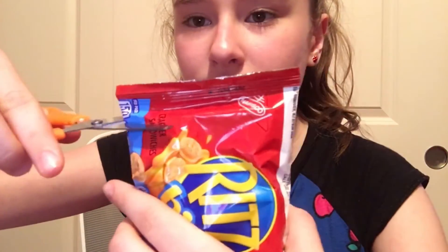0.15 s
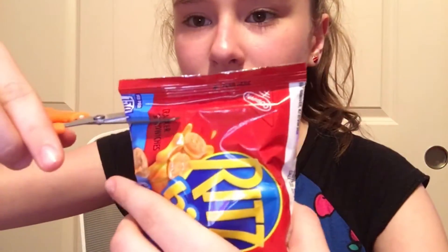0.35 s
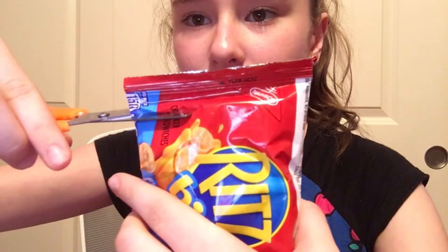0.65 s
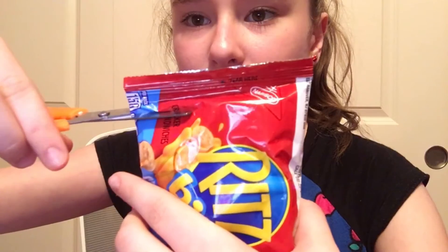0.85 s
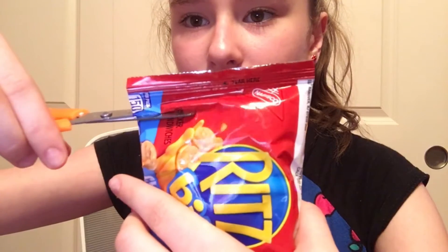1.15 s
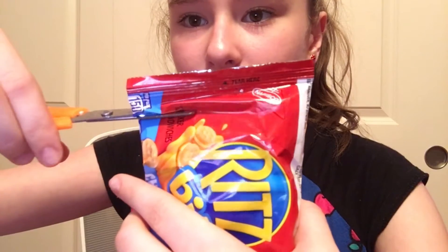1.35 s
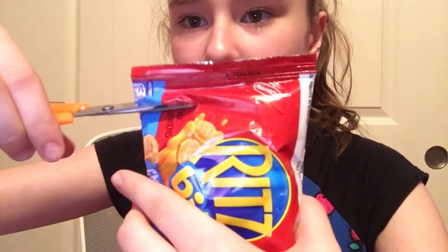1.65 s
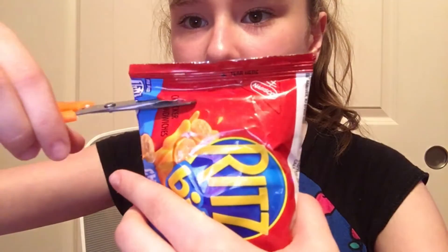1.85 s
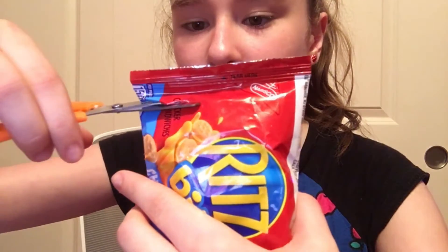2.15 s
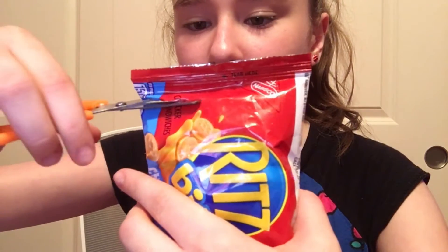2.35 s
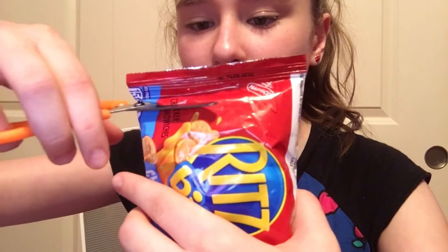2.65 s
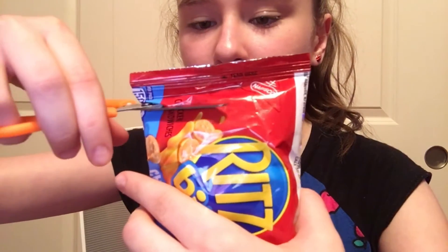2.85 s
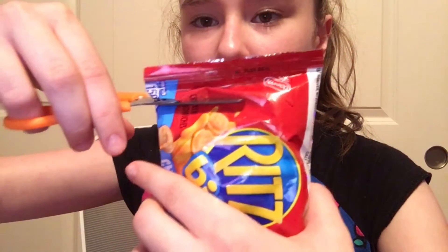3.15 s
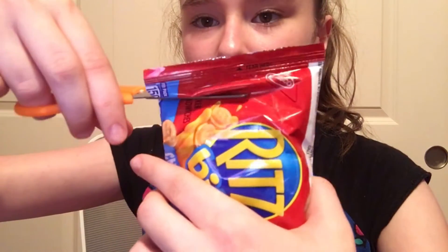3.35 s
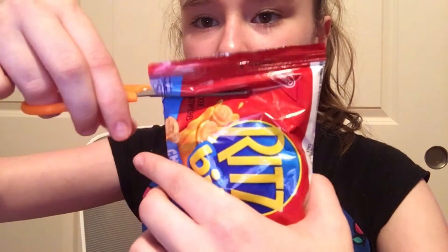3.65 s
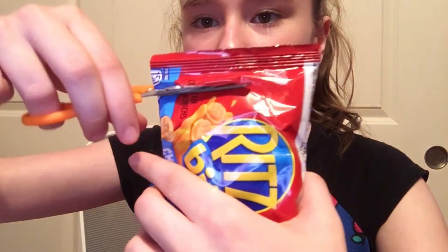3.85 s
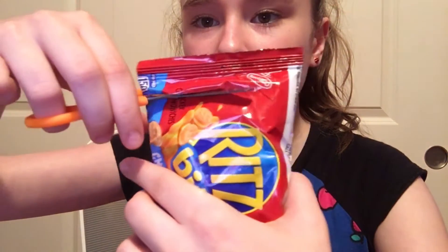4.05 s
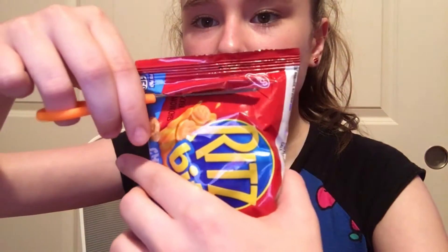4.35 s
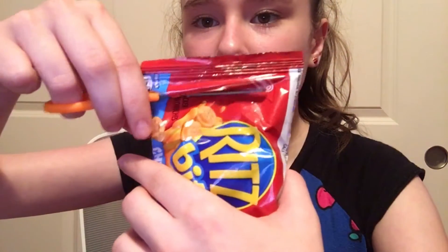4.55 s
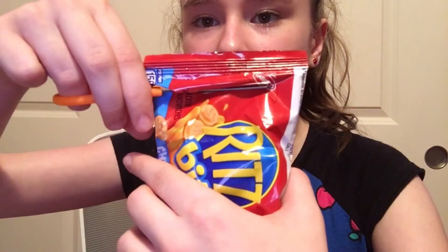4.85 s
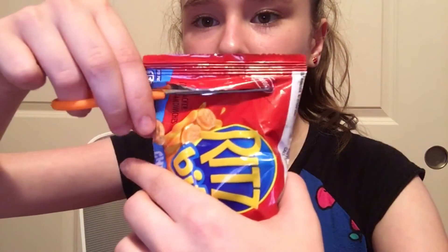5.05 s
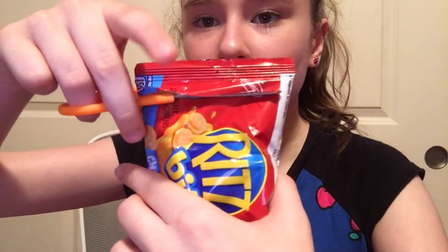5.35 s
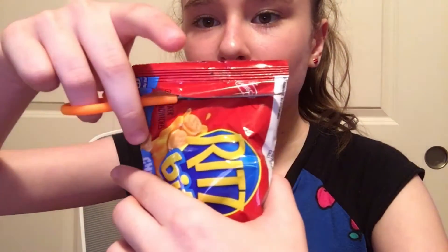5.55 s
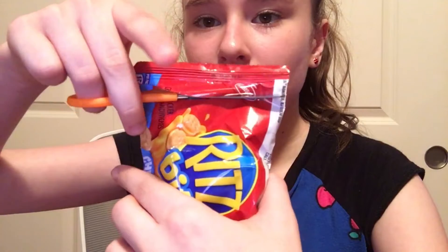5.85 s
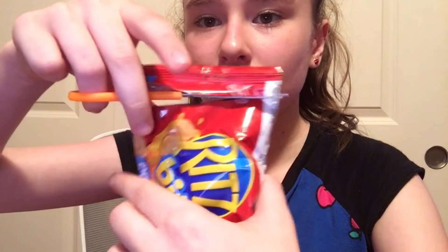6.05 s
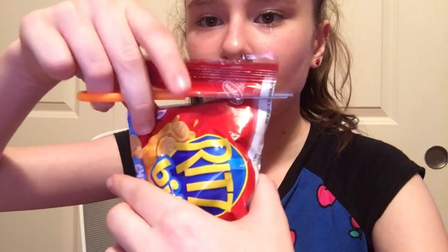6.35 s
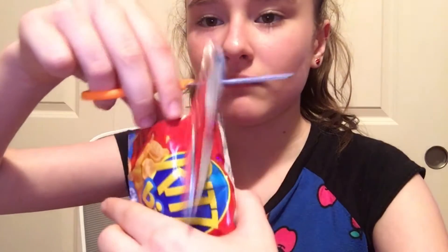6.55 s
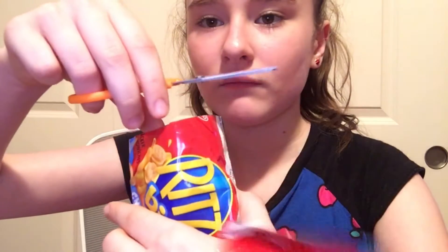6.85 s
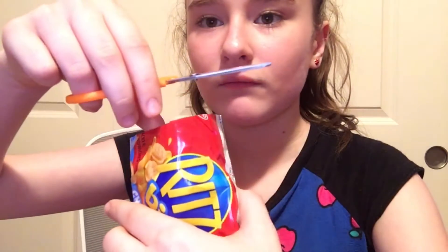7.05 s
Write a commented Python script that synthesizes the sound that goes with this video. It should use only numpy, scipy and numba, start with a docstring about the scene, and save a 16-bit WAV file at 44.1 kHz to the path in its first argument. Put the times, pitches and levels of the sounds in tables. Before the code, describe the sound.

Close to a small, easily overloaded microphone in a quiet little room, scissors work through a stiff plastic snack bag. Faint ticks give way to sharp irregular cracks and bright crinkling, then a short lull, a dense crackling run, more scattered hard snaps, and a final flurry as the top comes off. The loudest pops distort slightly. Low mains hum and soft hush lie underneath.

```python
"""Sharp cracks, the loudest clipped, leap out of a fine ticking rustle: scissors snip along a plastic snack bag
held close to a laptop microphone in a small room. Each crack is a ragged noise burst ringing film, air and foil;
the rustle is random puffs of noise through drifting resonances, faded in and out by every move of the hands.
Bands of fresh noise follow the bag's energy as a short dull tail, over sine-wave mains hum and a shaped hush."""
import sys
import numpy as np
from scipy import signal
from scipy.fft import rfft, irfft
from scipy.io import wavfile
from scipy.ndimage import uniform_filter1d
from numba import njit

SR = 44100
rng = np.random.default_rng(int(sys.argv[2]) if len(sys.argv) > 2 else 0)


def wrap_up_sound(samples):
    """Save the sound to the file named by the first command line argument, as 16-bit audio."""
    columns = np.atleast_2d(samples).T
    # keep every value between -1 and 1, then stretch to whole-number steps
    tamed = np.clip(columns, -1, 1)
    steps = np.round(tamed * 32767).astype(np.int16)
    wavfile.write(sys.argv[1], SR, steps)


N = 317520
T = np.arange(N) / SR

# resonances of the plastic film: (pitch [Hz], nominal width [Hz], level in the rustle before it wanders [dB])
FILM_MODES = [(570, 370, 1.5), (1198, 700, 9), (1830, 1500, 6.5), (2750, 800, 8), (4256, 550, 1.5)]
# sheen of the foil layer: (pitch [Hz], nominal width [Hz], level before it shifts [dB])
FOIL_MODES = [(5710, 2940, 4.5), (9800, 4600, -16), (11650, 2700, -3), (15200, 1900, -7.5)]


def cracks():
    """Creases in the stiff film buckle one by one; thin foil patches give way as smaller, brighter flicks."""
    # buckling creases: (time [s], panel level over 1.4 ms [dB], panel pitch [Hz],
    # bag thump re panel [dB], treble snap re panel [dB], nominal slip length [ms])
    buckles = [(0.0728, -30, 2850, -6, -9.5, 1.1), (0.2828, -23.5, 2310, -4, -30, 0.9),
               (0.3213, -6, 1620, -13, 0.5, 1.45), (0.3806, -13, 1000, -0.5, -19, 4.9),
               (0.444, -25, 1290, -13, -30, 0.69), (0.4539, -25.5, 970, 1, -16, 5.5),
               (0.487, -11, 2600, -9.5, -23, 0.65), (0.502, -7, 3370, -10, -3, 1.17),
               (0.532, -17.5, 1780, -5.5, -19, 3.3), (0.6579, -22, 2680, 0.5, -30, 0.77),
               (0.6662, -8.5, 1800, -9, -12.5, 1.14), (0.8744, -12.5, 3120, -2, -9, 2.2),
               (0.9561, -6.5, 1000, -5.5, -11.5, 2.6), (0.9909, -5, 2820, -16, -14, 1.3),
               (1.166, 2.5, 2720, -13, -3, 2.53), (1.176, -6.5, 3060, -6.5, -7.5, 4),
               (1.2939, -13, 1200, -5, -27, 1.2), (1.3212, -14, 1730, -19, -27, 1),
               (1.329, -13, 2390, -3, -9, 1.3), (1.3463, 6.5, 2360, -15.5, -14.5, 2.7),
               (1.4555, -14.5, 3080, -38, -0.5, 1.3), (1.4784, -9.5, 3620, -7, -13, 2.5),
               (1.5472, -14, 2430, -6, -17, 2.6), (1.6034, -26, 1210, -26, -14, 0.9),
               (1.6464, -12.5, 2900, -20, -18, 2.9), (1.655, -18.5, 1530, -7, -3, 2.3),
               (1.6752, -9.5, 2870, -11, -14, 1), (1.6978, -12.5, 2310, -14, -20, 1.6),
               (1.7046, -12.5, 2820, -11, -19, 1.3), (1.736, -12, 1510, -8, -29, 1.5),
               (1.755, -13, 2800, -13.5, -15, 1.6), (1.7593, -1.5, 2140, -12.5, -9.5, 1.8),
               (1.7685, 0.5, 2850, -8, -7, 3.2), (1.8091, -17, 2400, -6.5, -9.5, 1.2),
               (1.954, -6.5, 3020, -14, -11.5, 0.88), (2.07, -32, 1180, -5.5, -18, 2.5),
               (2.2294, -14, 1200, -6.5, -17, 3.3), (2.475, -22.5, 1390, -6, -18, 4.3),
               (2.504, -27.5, 3070, -26, -4.5, 4.3), (2.589, -22.5, 1030, -5, -29, 3.8),
               (2.6362, -13.5, 3060, -24, -4.5, 1.3), (2.9866, -6, 1046, -4.5, -14, 4.3),
               (3.0007, -11, 2300, -16, -20, 2.4), (3.0408, -25, 1690, -9, -25, 3),
               (3.122, -18.5, 1740, -5, -20, 2.7), (3.134, -13.5, 1500, -4.5, -23, 10),
               (3.1438, -7.5, 3400, -15, -10, 1.9), (3.1571, -8, 2800, -13, -7, 1.42),
               (3.1605, -9.5, 3000, -3.5, -7.5, 0.86), (3.198, -13.5, 1900, -10, -12, 2.5),
               (3.22, -11.5, 1890, -16, -5.5, 3.7), (3.225, -11.5, 3250, -4, -9, 3.6),
               (3.2294, -14.5, 1150, -6, -15, 4.1), (3.2478, -8.5, 2700, -12, -4, 1.8),
               (3.2778, -19, 1810, -3, -11, 1.5), (3.302, -23, 2500, -13, -8, 4),
               (3.3121, -6, 1710, -17, -9, 0.86), (3.343, -12, 4200, -6, -7, 0.92),
               (3.3722, -14, 2800, -3.5, -8, 1.7), (3.3859, -13.5, 1870, -15, -8, 5.5),
               (3.3921, -12, 4300, -4, -2, 3.4), (3.4009, -8, 1210, -12, -29, 3),
               (3.4385, -20.5, 4400, -5, -14, 4.2), (3.49, -20, 1930, -10, -13, 0.86),
               (3.5457, -15.5, 3160, -5.5, -17, 0.8), (3.561, -23.5, 970, -5, -4.5, 2.6),
               (3.6418, -19, 1780, -9.5, -21, 1.8), (3.6705, -11, 1320, -16.5, -12.5, 2.9),
               (3.6765, -10, 2760, -7.5, -31, 1.9), (3.689, -14.5, 2510, -17, -13, 1.3),
               (3.728, -18.5, 2650, -19, -19, 2.1), (3.7603, -13, 1290, -11.5, -16, 0.85),
               (3.79, -14, 1540, -13, -13, 1.6), (3.7977, -25, 3780, -7, -7, 0.99),
               (3.835, -3, 2600, -6.5, -7, 0.82), (3.8604, -14, 2500, -12, -15, 0.77),
               (3.931, -11.5, 2500, -11.5, -14, 2.9), (3.9505, -24, 2460, -8, -20, 0.88),
               (3.967, -24, 1540, -9, -24, 2.4), (4.2469, -21.5, 2840, -27, -14.5, 2.8),
               (4.3911, -9.5, 2030, -6, -9, 5.5), (4.399, -3, 1080, -14, -11, 1.5),
               (4.4586, -16, 2820, -11, -12, 1.7), (4.5301, -21, 2780, -16, -23, 2.4),
               (4.544, 1, 2830, -13, -8, 1.1), (4.5538, -2.5, 1680, -1, -19, 8.2),
               (4.557, -7, 890, -3, 0.5, 1.5), (4.5886, 2, 3170, -23, -1.5, 1.34),
               (4.5907, -20, 3080, -18, 5, 2.4), (4.596, -11, 3030, -13, 0, 1.4),
               (4.6564, -9.5, 1210, -47, -4, 1.2), (4.661, -5.5, 3130, -14, -12, 1.5),
               (4.6673, -5.5, 2960, -10, -5.5, 10), (4.6757, -2.5, 2900, -16, 0, 1.64),
               (4.6999, -10, 2180, -11, -27, 2.0), (4.7394, -18, 3320, -12, -3, 1),
               (4.8721, -21.5, 4430, -11, -8.5, 3.8), (4.9446, -18.5, 2070, -8, -11, 3),
               (4.9643, -13.5, 2880, -12, -2.5, 2.7), (5.0299, -2.5, 1020, -12.5, -15, 1.4),
               (5.22, -10, 2430, -19, 0, 5.9), (5.2252, 7, 2900, -9, -5.5, 3.26),
               (5.475, -27, 1840, -3, -18, 1.8), (5.7364, -24, 1720, -28, -20, 0.96),
               (5.7508, 0.5, 2900, -19, -5, 1.33), (5.809, -27, 1500, -5, -0.5, 8.9),
               (6.0304, -1, 3520, -15.5, -7.5, 1.75), (6.2002, -24, 3000, -21, -8, 2.4),
               (6.222, -24.5, 1196, -3.5, -25, 2.4), (6.2532, -9, 3050, -16, -0.5, 1.8),
               (6.293, -17, 3170, -11, -4, 1.1), (6.3656, -1, 2700, -11.5, -0.5, 0.69),
               (6.3677, -3, 1340, -7.5, -5, 2.2), (6.383, -14, 2260, -11, -1, 1.8),
               (6.3995, -5.5, 2360, -13, -28, 1.8), (6.4105, 0.5, 1670, -12, -4, 5.1),
               (6.431, -6, 1050, -16, -11, 3.8), (6.4805, -17, 1750, -2.5, -29, 0.59),
               (6.5963, -18.5, 1020, -4.5, -33, 3.4), (7.0206, -13.5, 2690, -15, -14.5, 0.84),
               (7.1088, -28, 1570, -9.5, -15, 2.5)]
    # bright ticks of small foil patches: (time [s], panel level over 1.4 ms [dB])
    flicks = [(0.271, -45.5), (0.525, -37), (0.584, -45.5), (.6393, -41), (0.763, -32), (0.8248, -39),
              (0.87, -33), (.8917, -32), (0.926, -27.5), (1.235, -40), (1.395, -38), (1.43, -43),
              (1.5972, -39), (1.877, -47), (2.141, -43.5), (2.362, -48), (3.1835, -34), (3.457, -41),
              (3.715, -34), (4.3714, -38), (4.468, -34), (4.4732, -27.5), (4.515, -37.5), (4.9216, -38),
              (5.059, -35), (5.917, -24), (6.352, -24.5), (6.574, -45), (6.8555, -43)]
    # what all flicks share: (panel pitch [Hz], bag thump [dB], treble snap [dB], nominal slip length [ms])
    flick_sound = (4190, -16, 4.5, 2.5)
    creases = buckles + [(*flick, *flick_sound) for flick in flicks]
    out = np.zeros(N + 1024)
    for time_s, level_db, *sound in creases:
        start = int(time_s * SR)
        out[start:start + 1024] += undb(level_db) * buckle(level_db, *sound)
    return out[:N]


def buckle(level_db, panel_hz, thump_db, snap_db, slip_ms):
    """A crease slips in a ragged burst; the panel rings briefly, the air in the bag thumps on a little longer."""
    t = np.arange(1024) / SR
    noise, ragged = rng.standard_normal((2, 1024))
    slip_s = max(slip_ms - 0.8, 0.2) / 1000
    front = noise * undb(3.5 * ragged) * np.minimum(t / 0.00016, 1) * np.exp(-(t / slip_s) ** 2)
    # the crease settles after the jump; the treble snap leaves this part out
    slip = front + 0.28 * noise * np.exp(-t / 0.0018)

    film = []
    for hz, width_hz, _ in FILM_MODES:
        bend, weight = rng.standard_normal(2)  # every fold retunes and reweights the film
        film.append(undb(7.2 * weight) * ring(slip, hz * np.exp(0.16 * bend), 0.32 * width_hz))
    low, *upper = film

    panel = unit(ring(slip, panel_hz, 0.2 * panel_hz)) + 0.69 * unit(sum(upper)) + 1.17 * unit(slip)
    panel = passband(1000, 4030)(panel)

    thump = unit(low) + 0.55 * unit(ring(slip, 916, 240)) + 0.56 * unit(ring(slip, 319, 140))
    thump = unit(passband(160, 2340)(thump))
    # strong buckles also shove air at the microphone
    puff = undb(-13.0 + 0.18 * level_db) * unit(ring(slip, 141, 59))

    crack = unit(panel) + undb(thump_db) * (thump + puff) + undb(snap_db) * sheen(front, snap_db)
    return crack * np.sqrt(0.0014 / t[-1])  # from level over the whole window to level over 1.4 ms


def sheen(x, snap_db):
    """The foil layer rings; the brighter the slip, the more the upper resonances join in."""
    foil = 0
    for k, (hz, width_hz, db) in enumerate(FOIL_MODES):
        mode = ring(ring(x, hz, width_hz), hz, width_hz)
        foil = foil + (-1) ** k * undb(db + 0.28 * k * snap_db) * mode
    return unit(foil)


def rustle():
    """Film slides on blades and fingers: dense grain and sparse ticks ring panels that drift in pitch and level."""
    # spans in which the film glides more smoothly: (from [s], to [s])
    slides = [(2.43, 2.75), (3.98, 4.36), (5.98, 6.19)]
    # pitch of the low scrape as the grip changes the air pocket in the bag: (time [s], pitch before drift [Hz])
    pocket = [(0, 560), (3.85, 600), (4.05, 360), (4.4, 360), (4.6, 520), (5.3, 600), (7.2, 630)]
    sliding = sum((T > start) & (T < end) for start, end in slides)
    tick_gain = undb(-4 * sliding)  # sparse ticks are weaker against the grain while sliding
    sheet_ticks = 1.25 * ticks(70, 8.1, 0.0027)
    scrape_mode = [(np.interp(T, *np.transpose(pocket)), *FILM_MODES[0][1:])]

    layers = []
    for modes in (scrape_mode, FILM_MODES[1:], FOIL_MODES):
        layer_ticks = sheet_ticks + 0.7 * ticks(250, 5, 0.0004)
        panels = 0
        for hz, width_hz, db in modes:
            panel_ticks = layer_ticks + 0.58 * ticks(42, 6.4, 0.0012)
            grain = ticks(2400, 1.6, 0.0036)
            slips = tick_gain * panel_ticks + grain
            drifting_hz = np.minimum(hz * np.exp(0.086 * walk(14)), 0.45 * SR)
            panel = glide(slips, drifting_hz, 1.0 * width_hz)
            panel = glide(panel, drifting_hz, 2.0 * width_hz)
            panels = panels + undb(db + 2.42 * walk(14)) * panel  # panels take turns in sounding loudest
        layers.append(unit(panels))
    return sum(gain * layer for gain, layer in zip(handling(), layers))


def ticks(rate_hz, spread_db, smear_s):
    """Random tiny slips, most faint and a few strong, each a short decaying puff of noise."""
    when, chance = rng.random((int(rate_hz * N / SR), 2)).T
    strength_db = np.minimum(-spread_db * np.log(1 - chance), 14.5)
    slips = np.bincount((when * N).astype(int), undb(strength_db), N)
    puffs = signal.lfilter([1], [1, -np.exp(-1 / (smear_s * SR))], slips)
    return unit(puffs * rng.standard_normal(N))


def handling():
    """Gains of scrape, film and foil: moves rise, hold and fade straight in dB, and their powers add up."""
    # moves of blades or fingers: (time of full level [s], rustle level [dB], rise per 20 dB [ms], hold [ms],
    # fade per 20 dB [ms], low scrape re rustle [dB], treble re rustle [dB])
    moves = [(0.012, -42, 4.7, 47, 30, -5, -14.5), (.176, -47.5, 60, 4.6, 121, -16, -13),
             (.335, -48, 80, 220, 230, -6.5, -11), (.874, -47.5, 120, 170, 205, -2, -5),
             (1.143, -39, 6.5, 20, 30.3, -3, -10), (1.175, -29.5, 17, 5, 74.07, -8, -12),
             (1.279, -31, 8.7, 35, 60, -26, -13), (1.342, -25, 40, 3.1, 68, -4, -6),
             (1.475, -31.5, 48, 4.4, 74.07, -11.5, -14), (1.637, -28, 52, 5.8, 74.6, -12.5, -10.5),
             (1.774, -32, 29, 5, 120.4, -16.5, -7.5), (2.34, -46, 810, 61, 100, -9, -24),
             (2.455, -35, 48, 70, 285, -8, -11.5), (2.7, -35, 260, 26, 38.4, -7, -8),
             (3.149, -35.5, 110, 22, 100, -4, -14), (3.237, -33, 73, 20, 150, -14, -8),
             (3.309, -26, 9.7, 39, 40, -6.5, -12), (3.394, -28, 37, 3.9, 77.4, -15, -12),
             (3.686, -31, 66, 38, 201, -8, -8), (3.95, -32.5, 180, 85, 122, -8.5, -9),
             (4.12, -39.5, 200, 74, 198, -2, -15), (4.406, -34, 150, 14, 198, -2.5, -10),
             (4.526, -32.5, 7, 110, 102, -6, -7), (4.654, -20.5, 11, 46, 65, -8, -9),
             (4.956, -31, 60, 4.3, 199, -7, -7.5), (5.236, -29, 140, 3.1, 143, -8, -9),
             (5.47, -41.5, 400, 11, 196, -1, -10.5), (5.704, -41, 30, 53, 50, -8, -18),
             (5.757, -34.5, 30, 63, 246, -4.5, -9), (6.03, -28, 58, 35, 84, -4.5, -9),
             (6.12, -41, 510, 15, 60, 2, -24), (6.205, -39, 8, 120, 200, -9.5, -7),
             (6.4, -26.5, 190, 39, 151, -7.5, -10.5), (6.52, -40, 150, 95, 25.8, -9, -13.5),
             (6.929, -43.5, 11, 5.6, 110, -10, 1)]
    still_db, still_scrape_db, still_treble_db = -65.5, -5, -6  # the bag is never quite still in the hand
    time_s, db, rise_ms, hold_ms, fade_ms, scrape_db, treble_db = np.transpose(moves)[:, :, None]
    coarse_t = T[::64]
    ms = 1000 * (coarse_t - time_s)
    slope = np.maximum(-ms / rise_ms, (ms - hold_ms) / fade_ms)
    db = db - 20 * np.maximum(slope, 0)

    gains = []
    for move_rel_db, still_rel_db in ((scrape_db, still_scrape_db), (0, 0), (treble_db, still_treble_db)):
        power = (undb(db + move_rel_db) ** 2).sum(axis=0) + undb(still_db + still_rel_db) ** 2
        gains.append(np.interp(T, coarse_t, np.sqrt(power)))
    return gains


def walls(x, gap_s=0.0012):
    """Diffuse return; the bag keeps moving, so each band's stored energy comes back with ever new phases."""
    # room tail: (frequency [Hz], 60 dB decay time [s], return level [dB])
    tail = [(293, 0.089, -16.5), (2590, 0.18, -16.5), (12800, 0.16, -23)]
    at_hz, t60_s, db = np.transpose(tail)
    out, lag = 0, int(gap_s * SR)
    for hz in 250 * 2 ** np.arange(0, 6, 2 / 3):
        band = passband(hz * 2 ** (-1 / 3), hz * 2 ** (1 / 3), order=2)
        keep = np.exp(-2 * np.log(1000) / (np.interp(hz, at_hz, t60_s) * SR))  # power kept per sample
        power = uniform_filter1d(np.roll(band(x) ** 2, lag), lag)
        stored = signal.lfilter([1 - keep], [1, -keep], power)
        fresh_noise = unit(band(rng.standard_normal(N)))
        out = out + undb(np.interp(hz, at_hz, db)) * np.sqrt(np.abs(stored)) * fresh_noise
    return out


def room():
    """Mains hum, a stack of steady sines, under a steady hush of spectrally shaped noise."""
    # hum partials: (pitch over the mains frequency [ratio], rms level [dB]); the second is an unrelated drone
    partials = [(1, -48), (1.26, -56), (2, -55.5), (4, -60), (5, -62), (6, -66)]
    # tilt of the hush: (frequency [Hz], relative spectral level [dB])
    hush_tilt = [(25, -29.5), (45, -7), (100, -10), (200, -10), (320, -14), (450, -20.5), (3000, -28.5),
                 (7000, -39), (15000, -44.5)]
    mains_hz, hush_db = 59.4, -52.5
    hum = 0
    for ratio, db in partials:
        cycles = ratio * mains_hz * T + rng.random()
        hum = hum + undb(db) * np.sqrt(2) * np.sin(2 * np.pi * cycles)
    hz, db = np.transpose(hush_tilt)
    log_hz = np.log(np.fft.rfftfreq(N, 1 / SR) + 1)
    shape = undb(np.interp(log_hz, np.log(hz), db, left=-40))
    hush = unit(irfft(rfft(rng.standard_normal(N)) * shape, N))
    return hum + undb(hush_db) * hush


def undb(db):
    """Decibels to amplitude."""
    return 10 ** (np.asarray(db) / 20)


def unit(x):
    """Scale to an rms of 1."""
    return x / np.sqrt(np.mean(x ** 2))


def ring(x, hz, width_hz):
    """One fixed resonance, gain 1 at the centre."""
    return signal.lfilter(*signal.iirpeak(hz, hz / width_hz, fs=SR), x)


@njit
def glide(x, hz, width_hz):
    """One resonance whose centre moves, gain 1 at the centre: a state-variable filter."""
    y, band, low = np.empty(len(x)), 0., 0.
    for i in range(len(x)):
        g, damping = np.tan(np.pi * hz[i] / SR), width_hz / hz[i]
        v = (band + g * (x[i] - low)) / (1 + g * (g + damping))
        band = 2 * v - band
        low = low + 2 * g * v
        y[i] = damping * v
    return y


def walk(rate_hz):
    """Slews from one random value to the next, rate_hz values a second, with a spread just under 1."""
    step = int(SR / rate_hz)
    held = np.repeat(rng.standard_normal(N // step + 1), step)
    return uniform_filter1d(held, step)[:N]


def passband(lo_hz, hi_hz, order=3):
    """A filter that keeps the band between two edges."""
    sos = signal.butter(order, [lo_hz, hi_hz], "band", fs=SR, output="sos")
    return lambda x: signal.sosfilt(sos, x)


def scene():
    """The bag, its return from the walls, and the room beneath."""
    bag = cracks() + rustle()
    return (bag + walls(bag) + room())[None]


def record(dry):
    """The overloaded input clips at full scale; then the top is cut above 15650 Hz."""
    clipped = np.clip(dry, -1, 1)
    return signal.sosfilt(signal.ellip(8, 0.5, 60, 15650, fs=SR, output="sos"), clipped)


dry = scene()
out = record(dry)
wrap_up_sound(out)
```